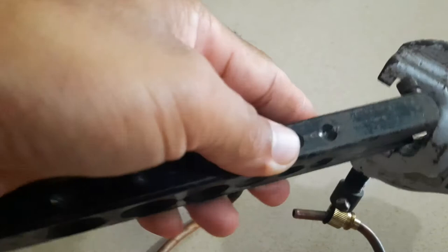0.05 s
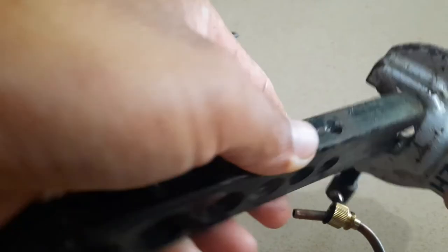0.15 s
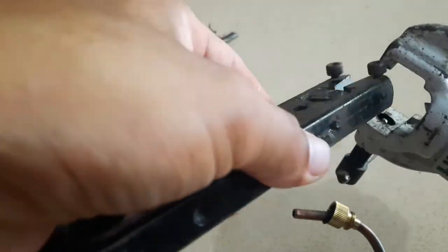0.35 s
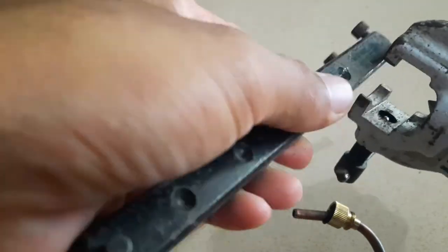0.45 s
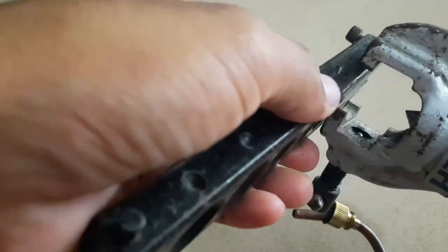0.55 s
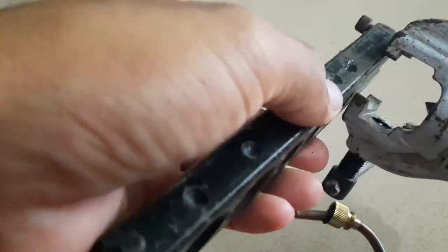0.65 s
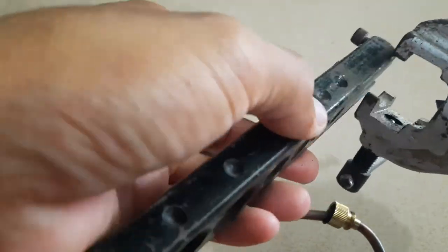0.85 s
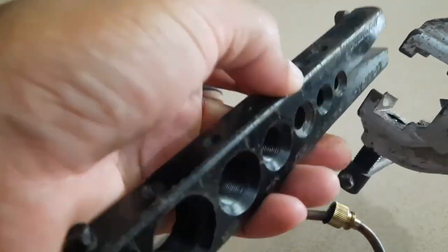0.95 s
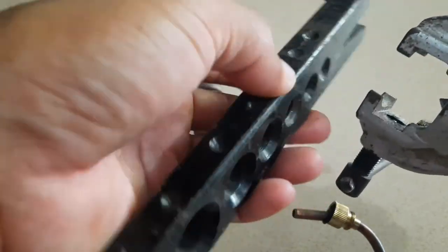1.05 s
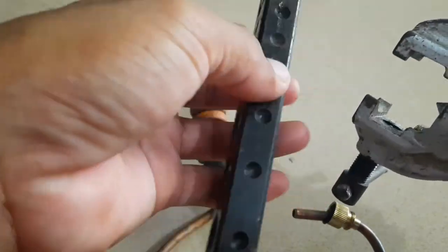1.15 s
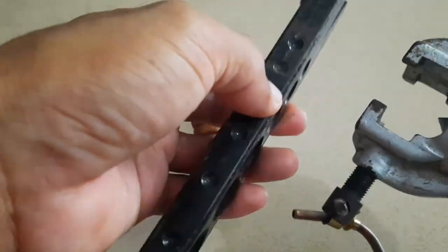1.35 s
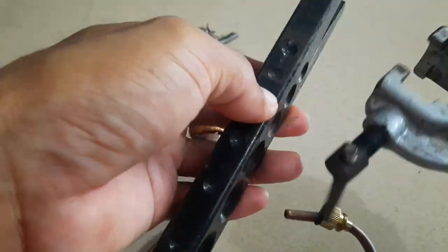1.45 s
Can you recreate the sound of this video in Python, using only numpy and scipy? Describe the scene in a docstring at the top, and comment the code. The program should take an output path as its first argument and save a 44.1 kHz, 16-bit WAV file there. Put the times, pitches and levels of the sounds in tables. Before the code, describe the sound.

Close up in a small room, short metallic clinks sound as a hand-held bar knocks on a clamp. The hand shifts with dull bumps, and the bar ticks lightly twice over a faint, steady rumble.

```python
"""At a table in a small room, a hand-held steel bar knocks on a cast metal clamp, close up and in stereo.
Each knock cracks and rings the hand-damped clamp; a short drag makes it sing, and the table jolts.
The grip shifts with dull thuds, the palm slides, then two light ticks ring small parts of the bar.
The room answers faintly over a low, steady rumble."""
import sys
import numpy as np
from scipy import signal
from scipy.fft import rfft, irfft
from scipy.io import wavfile

SR = 44100
rng = np.random.default_rng(int(sys.argv[2]) if len(sys.argv) > 2 else 0)


def output_pcm(signal):
    """Save a mono or channel-first signal as 16-bit PCM at the path in sys.argv[1].

    Samples are clipped to [-1, 1] before scaling.
    """
    pcm = np.clip(np.atleast_2d(signal).T, -1, 1) * 32767
    wavfile.write(sys.argv[1], SR, np.round(pcm).astype(np.int16))


N = 66150
CRACK_PAN_DB = 2.5  # cracks sit a little to the left


def clamp():
    """The clamp sounds under the bar: a noisy crack, and a ring whose mix of modes depends on the spot."""
    # spots on the clamp: edge, inside, jaw, back
    places = ("edge", "inside", "jaw", "back")
    # clamp modes: f/Hz, t60/s, left-right/dB, left lead/rad, then level/dB for each spot
    clamp_modes = [ (1545, .033, 12, -1.5, -23, -26, -12, -24), (1700, .03, 3, -.5, -26, -19, -26, -30),
                   (2305, .035, -3, 2.5, -9, -7, -4.5, -2), (2635, .03, 9, 1.5, -14.5, -33, -46, -19.5),
                   (4030, .055, 6, 2.3, -18, -11, -12.5, -9), (4180, .07, 0, 2.5, -23, -14, -15, -9),
                   (4250, .026, -3, 3, -13, -11.5, -12, -25.5),
                   (5700, .028, 3, 1.5, -17.5, -9, -39.5, -5.5),
                   (5842, 0.035, 9.5, 1.46, -9.5, -0.5, -14.5, -14),
                   (6000, .045, 10, 3.5, -12, -20.5, -20.5, -31.5),
                   (7210, .024, -6, -1.3, -23, -10.5, -23, -16), (7555, .034, 5, -.9, -16, 3, -5, -19),
                   (7860, .033, 5, -1, -7.5, -3.5, -.5, -35), (8200, .018, 11, -2.5, -7, -18, -15, -30),
                   (9880, .022, 5.5, -2.33, -28, -13, -36, -35), (10040, .025, 5, -2, -10, -22, -30, -35),
                   (10560, .036, -1.5, .5, -18, -4.5, -30, -22),
                   (10670, .036, -4, 2.14, -21.5, -12, -6, -35), (12150, .03, 13, 1.3, -28, -12, -20, -17),
                   (12540, .045, 4, 3, -30, -12, -22, -19),
                   (13000, .03, -3, -0.5, -28, -23.5, -13.5, -34.5),
                   (13490, 0.03, 14, 5.4, -32, -10, -20.5, -35.5),
                   (13980, 0.033, 3, 1.4, -26.5, -23, -16.5, -40.5)]
    # knocks, plus a faint after-ring at 0.487 s that echoes the knock at 0.44 s:
    # t/s, spot, ring level/dB, rise/s, ring hold/s, ring t60 factor, crack level/dB, crack t60/s
    soundings = [ (0.0856, "edge", -27.5, 0.0019, 0.0012, .66, -35.5, 0.027),
                 (0.0895, "edge", -32.5, 0.00069, .001, 0.71, -40, 0.03),
                 (0.101, "edge", -51, .00099, 0.0042, 0.88, -53, 0.086),
                 (0.201, "edge", -41, .00088, .001, .52, -31.5, .02),
                 (0.2032, "inside", -16.5, .0024, .0024, 0.77, -24.5, .026),
                 (0.2082, "jaw", -30.5, .0008, .001, 0.94, -27, .025),
                 (.2115, "back", -28.5, 0.0012, 0.003, .7, -40, .02),
                 (0.2179, "inside", -39, .001, .002, 1.2, -45, .07),
                 (0.2553, "back", -37.5, 0.00044, 0.0015, .65, -41, .014),
                 (0.3268, "back", -49.5, .0004, 0.0016, .72, -53.5, .016),
                 (0.336, "edge", -54.5, .0012, 0.0011, 0.68, -57.5, .02),
                 (.441, "jaw", -25, 0.0013, 0.0045, 0.94, -30, 0.027),
                 (0.487, "inside", -62, 0.0041, 0.0053, 1.5, -57, 0.066),
                 (0.634, "inside", -50, .00084, .0012, 0.95, -53.5, .02)]
    # crack spectrum: f/Hz, level/dB
    crack_colour = [(100, 1), (450, -3.5), (900, -11), (1700, -4), (2600, -4), (3300, 0), (4500, 4.5),
                    (5200, -6), (7800, 2), (9300, -2), (13600, -8.5), (14700, -12.5), (16000, -19)]
    rings, cracks = 0, 0
    for start, place, ring_db, rise, hold, length, crack_db, crack_t60 in soundings:
        spot = places.index(place)
        modes = [(hz, t60, pan_db, lead, levels[spot]) for hz, t60, pan_db, lead, *levels in clamp_modes]
        rings += undb(ring_db) * ring(modes, start, rise, hold, length)
        cracks += undb(crack_db) * burst(start, rise, crack_t60)
    return rings, cracks * noise(crack_colour, correlation=.1) * pan(CRACK_PAN_DB)


def bar():
    """A small pin and a loose fitting on the bar ping and crack as it is turned upright."""
    # pin modes: f/Hz, t60/s, left-right/dB, left lead/rad, level/dB
    pin_modes = [(3244, 0.055, -3.5, 2.5, -32), (3520, 0.052, -0.5, 1.65, -24.5),
                 (3960, 0.06, -6, 3, -31.5), (4700, 0.035, -2, .5, -33), (5800, .03, -4, 1, -30),
                 (7030, 0.018, 13, -1.5, -24), (9290, 0.036, 6.5, .83, -4), (10970, 0.031, 2, 1.3, -25),
                 (10970, 0.029, 2, 2, -25)]
    # fitting modes: f/Hz, t60/s, left-right/dB, left lead/rad, level/dB
    fitting_modes = [(2250, .035, 0, 1, -16), (3550, .025, -3, 1, -20), (4550, .022, -7, 0, -13),
                     (5100, .02, 0, 0, -18), (5800, .02, -8, 0, -13), (6680, .02, 12, -.4, -7),
                     (7220, .025, 4, -1.6, -5), (7660, .022, 8, -1, -5), (8900, .022, 3, 1, -7),
                     (9160, .022, 3, 1.9, -6), (10300, .033, 6, -.1, -1), (10880, .027, 2, -.2, 0),
                     (11230, .022, 3, 0, -7), (12720, .024, 2, -.5, -3), (13080, .022, 0, -.5, -5)]
    # two ticks, three clicks each: t/s, part, ring level/dB, ring rise/s, hold/s, crack/dB, crack t60/s
    ticks = [(1.3371, "pin", -52, .001, .0012, -43, 0.066),
             (1.3398, "pin", -26, .0038, 0.0064, -46.5, 0.065), (1.349, "pin", -55, .001, .001, -50.5, .05),
             (1.4376, "fitting", -36, .0005, 0.0015, -41, .036),
             (1.4415, "fitting", -39.5, 0.00049, 0.00043, -46, 0.054),
             (1.447, "fitting", -52, .0005, .001, -44, .03)]
    # crack spectrum: f/Hz, level/dB
    crack_colour = [(300, -0.5), (1500, -4), (3000, -7), (5500, -4), (7500, -0.5), (11000, 1),
                    (14000, -1.5), (16000, -8.5)]
    parts = {"pin": pin_modes, "fitting": fitting_modes}
    pings, cracks = 0, 0
    for start, part, ring_db, rise, hold, crack_db, crack_t60 in ticks:
        pings += undb(ring_db) * ring(parts[part], start, rise, hold)
        cracks += undb(crack_db) * burst(start, rise=.00039, t60=crack_t60)
    return pings, cracks * noise(crack_colour, correlation=.12) * pan(CRACK_PAN_DB)


def grip():
    """The bar shifts in the hand: a quick run of soft bumps that stir low resonances."""
    # thuds: t/s, level/dB, noise t60/s
    thuds = [(.739, -31.5, .07), (.749, -40, .06), (.762, -37, 0.13), (.786, -34, .09), (.797, -38, 0.079),
             (.815, -40.5, .1)]
    # low resonances: f/Hz, t60/s, left-right/dB, left lead/rad, level/dB
    thud_modes = [(133.4, 0.16, 0.5, 0, -2.5), (162.6, 0.1, 0, 0, -5.5), (199.3, 0.12, 4, 0, -5),
                  (402, 0.072, 12.5, 0.00086, -10.5), (686, 0.072, 7.5, 0.0017, -11.5)]
    # bump spectrum: f/Hz, level/dB
    thud_colour = [(30, -38), (80, -19), (135, 4.5), (200, 7), (280, -7.5), (420, -2.5), (720, -13.5),
                   (1100, -19.5), (3000, -31), (12000, -46)]
    rise_s, noise_db = .0063, -5.5
    boom = sum(undb(db) * ring(thud_modes, start, rise_s) for start, db, _ in thuds)
    bumps = sum(undb(db) * burst(start, rise_s, t60) for start, db, t60 in thuds)
    return boom + undb(noise_db) * bumps * noise(thud_colour, correlation=.83)


def table():
    """Some knocks jolt the table under the clamp: a short, dead band of noise on the left."""
    # jolts: t/s, level/dB, t60/s, centre f/Hz, width/octaves
    jolts = [(0.2027, -38.5, 0.031, 250, 1.4), (.4404, -40, 0.02, 1000, 0.57),
             (0.6307, -49.5, 0.022, 1010, 0.54)]
    out = 0
    for start, db, t60, hz, octaves in jolts:
        band = [(hz * 2 ** (k * octaves), -3 * k * k) for k in np.arange(-5, 6)]
        out += undb(db) * burst(start, rise=.0053, t60=t60) * noise(band, correlation=.89)
    return out * pan(db=11.5)


def drag():
    """The bar drags over the clamp before the big knock; friction keeps a few resonances singing."""
    # strokes: peak t/s, width/s, level/dB
    strokes = [(.158, .016, -59), (.198, .003, -48.5)]
    # rubbed resonances: f/Hz, width/Hz, level/dB
    drag_modes = [(2290, 70, 1), (5900, 110, -4.5), (7560, 110, -13.5), (12150, 60, -8.5),
                  (13550, 70, -14.5)]
    f = np.fft.rfftfreq(N, 1 / SR)
    body = sum(undb(db) / (1 + 2j * (f - hz) / width) for hz, width, db in drag_modes)
    singing = irfft(rfft(rng.standard_normal((2, N))) * body, N)
    return swells(strokes) * singing / singing.std()


def palm():
    """The palm slides on the bar with a faint swell of skin hiss."""
    # slide: peak t/s, width/s, level/dB
    slides = [(1.09, 0.065, -66)]
    # hiss spectrum: f/Hz, level/dB
    hiss_colour = [(800, -19.5), (2500, 7), (6000, -2), (11000, -4.5), (15000, -17)]
    return swells(slides) * noise(hiss_colour, correlation=0)


def room(send):
    """The hard walls return a faint diffuse tail and two scattered echoes."""
    # wall echoes: delay/s, level/dB, t60/s
    echoes = [(.044, -26.5, .078), (.070, -30.5, .08)]
    # reverb tone: f/Hz, level/dB
    room_colour = [(300, -0.5), (2000, 1.5), (6000, -1.5), (9000, -4.5), (13000, 1), (16000, -1)]
    tail_db = -24.5
    shapes = [(tail_db, burst(0, rise=.02, t60=.26))]
    shapes += [(db, burst(delay, rise=.0066, t60=t60)) for delay, db, t60 in echoes]
    response = sum(undb(db) * shape / np.linalg.norm(shape) * rng.standard_normal((2, N))
                   for db, shape in shapes)
    response = irfft(rfft(response) * undb(along(room_colour)), N)[:, :N // 2]
    return signal.fftconvolve(send, response, axes=1)[:, :N]


def rumble():
    """Steady, low room tone, centred in the bass and wide above it."""
    # rumble spectrum: f/Hz, level/dB
    colour = [(20, -24), (55, -3), (75, -5.5), (105, 2.5), (170, -8.5), (270, -2), (420, -16), (620, -15.5),
              (900, -8.5), (1300, -15.5), (2200, -19.5), (3300, -33), (6000, -33.5), (11000, -36.5),
              (15500, -51)]
    # stereo image: f/Hz, left-right correlation
    correlation = [(60, 0.72), (150, 1), (300, 0.61), (600, -0.28), (1500, -0.28), (5000, 0.18)]
    return undb(-50.5) * noise(colour, along(correlation))


def ring(modes, start, rise, hold=0, length=1):
    """Decaying stereo modes, shaken in level and phase by loose contact; length scales their t60."""
    chatter_depth, chatter_hz = .26, 220
    out = np.zeros((2, N))
    first = int(start * SR)
    span = slice(first, min(N, first + SR // 5))
    age = np.arange(N)[span] / SR - start
    for hz, t60, pan_db, lead, db in modes:
        chatter = chatter_depth * rng.standard_normal((2, 64))
        flutter, slip = (np.interp(age * chatter_hz, np.arange(64), row) for row in chatter)
        phase = 2 * np.pi * hz * age + slip + np.array([[lead], [-lead]]) / 2
        level = undb(db) * (1 + flutter) * envelope(age, rise, t60 * length, hold)
        out[:, span] += level * pan(pan_db) * np.sin(phase)
    return out


def noise(colour, correlation):
    """Stereo noise of rms 1 with a given spectrum and left-right correlation."""
    c = np.clip(correlation, -1, 1)
    mid, side = rfft(rng.standard_normal((2, N))) * undb(along(colour))
    mid, side = mid * np.sqrt(1 + c), side * np.sqrt(1 - c)
    x = irfft(np.array([mid + side, mid - side]), N)
    return x / x.std()


def envelope(age, rise, t60, hold):
    """A smooth attack, a hold, then an exponential decay; all times in seconds."""
    attack = np.sin(np.pi / 2 * np.clip(age / max(rise, 1e-5), 0, 1)) ** 2
    return attack * np.exp(-np.log(1000) * np.clip((age - rise - hold) / t60, 0, 10))


def burst(start, rise, t60):
    """An attack and decay placed on the timeline."""
    return envelope(np.arange(N) / SR - start, rise, t60, hold=0)


def swells(strokes):
    """A bell-shaped fade in and out for each stroke."""
    t = np.arange(N) / SR
    return sum(undb(db) * np.exp(-((t - peak) / width) ** 2 / 2) for peak, width, db in strokes)


def along(points):
    """A curve through (f/Hz, value) points on a log axis, read at every FFT bin."""
    hz, value = np.array(points, float).T
    return np.interp(np.log(np.fft.rfftfreq(N, 1 / SR) + 1e-3), np.log(hz), value)


def pan(db):
    """Left and right gains for a level difference; positive is left."""
    return undb(np.array([[db], [-db]]) / 2)


def undb(db):
    """Decibels to gain."""
    return 10 ** (np.asarray(db) / 20)


def scene():
    """Metal and hand over the room tone; rings and pings feed the reverb less than the noises do."""
    ring_send_db, ping_send_db = -11.5, -22
    room_tone = rumble()
    handling = grip() + palm() + table()
    rings, clamp_cracks = clamp()
    pings, tick_cracks = bar()
    noises = clamp_cracks + tick_cracks + handling + drag()
    send = noises + undb(ring_send_db) * rings + undb(ping_send_db) * pings
    return rings + pings + noises + room(send) + room_tone


def record(dry):
    """Gain control ducks after loud peaks, a soft clip rounds them, and a low-pass cuts the top treble."""
    duck_db_per_unit, attack_s, release_s = 2, .03, .3
    ceiling, top_hz = .9, 15800
    release = np.exp(-np.arange(N) / SR / release_s)
    held_peak = np.maximum.accumulate(np.abs(dry).max(axis=0) / release) * release
    pole = np.exp(-1 / (attack_s * SR))
    smoothed_peak = signal.lfilter([1 - pole], [1, -pole], held_peak)
    ducked = dry * undb(-duck_db_per_unit * smoothed_peak)
    rounded = ceiling * np.tanh(ducked / ceiling)
    return signal.sosfilt(signal.ellip(8, .2, 80, top_hz, fs=SR, output="sos"), rounded)


dry = scene()
out = record(dry)
output_pcm(out)
```